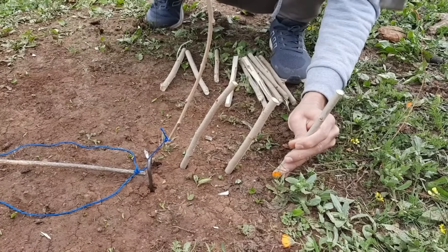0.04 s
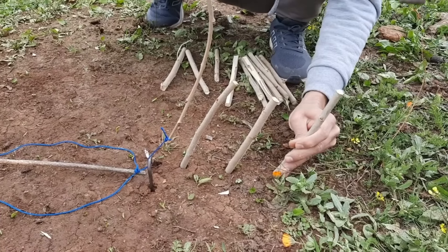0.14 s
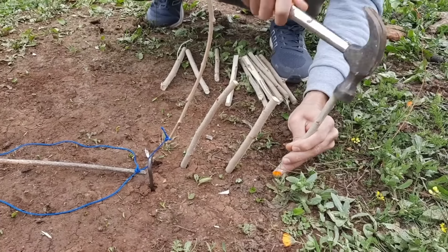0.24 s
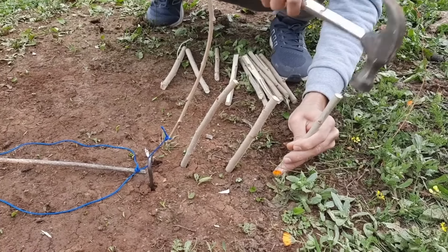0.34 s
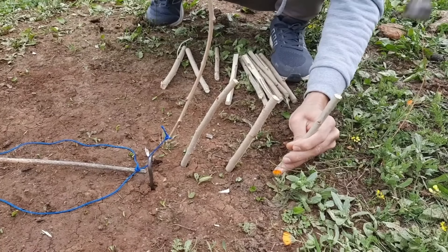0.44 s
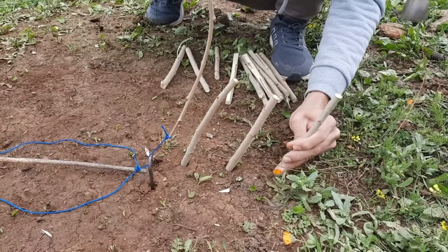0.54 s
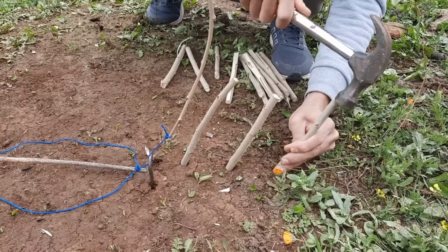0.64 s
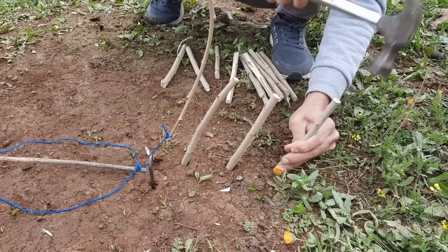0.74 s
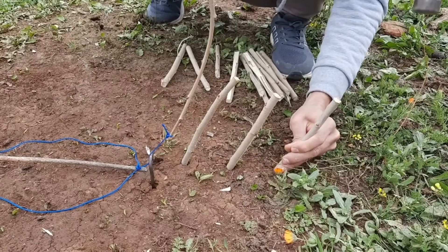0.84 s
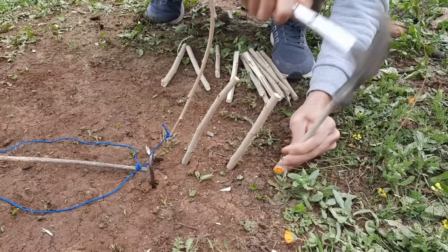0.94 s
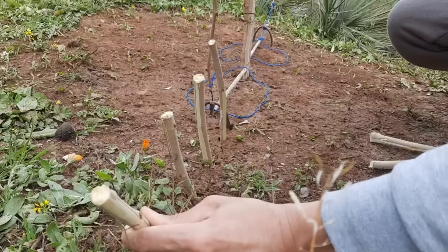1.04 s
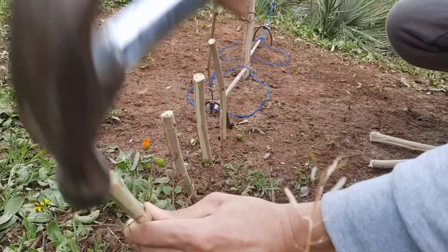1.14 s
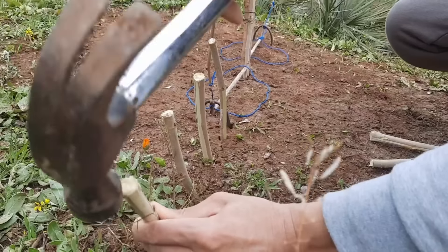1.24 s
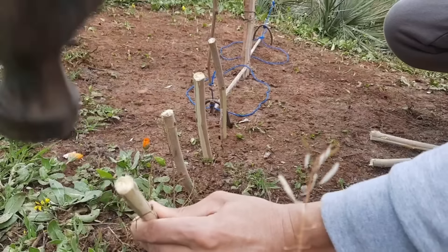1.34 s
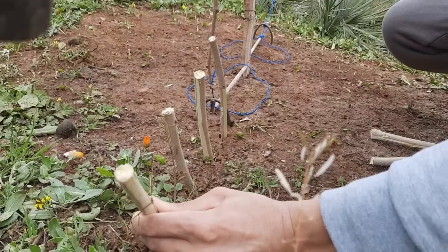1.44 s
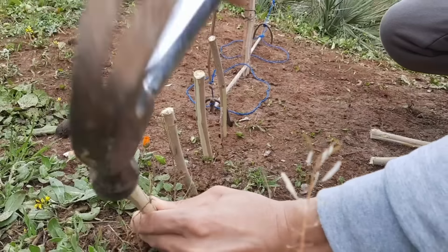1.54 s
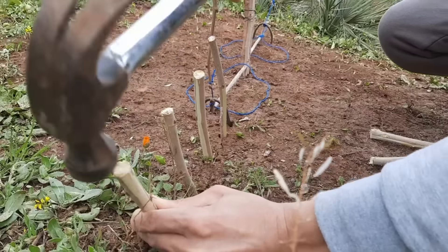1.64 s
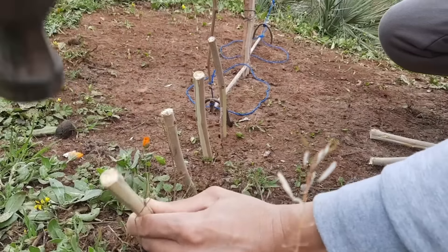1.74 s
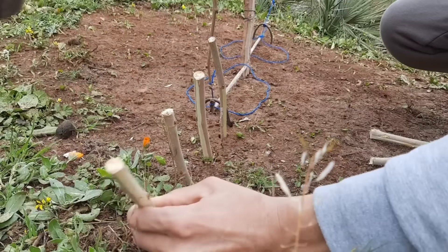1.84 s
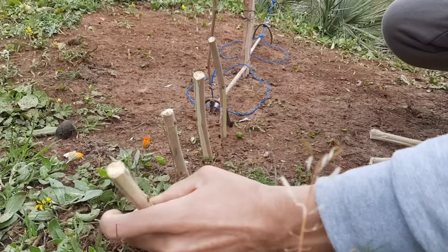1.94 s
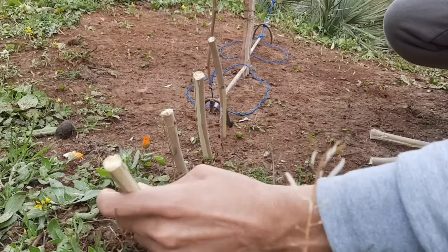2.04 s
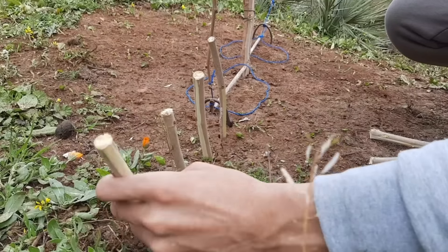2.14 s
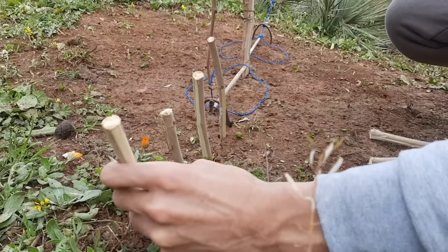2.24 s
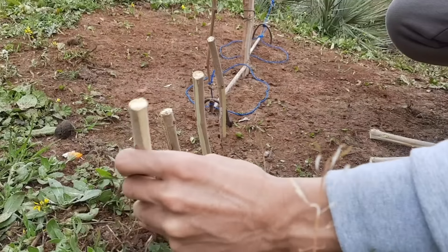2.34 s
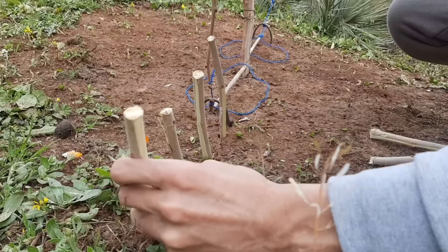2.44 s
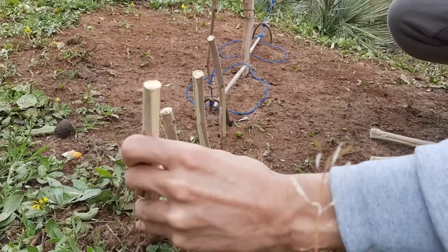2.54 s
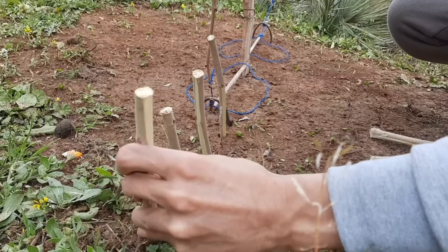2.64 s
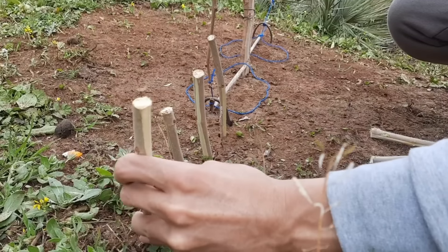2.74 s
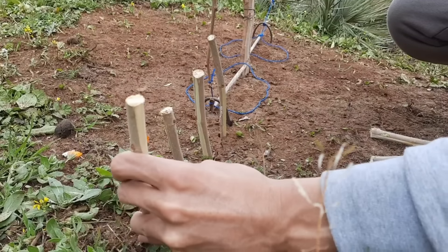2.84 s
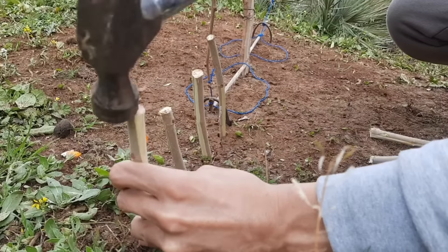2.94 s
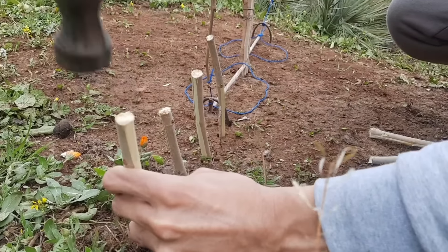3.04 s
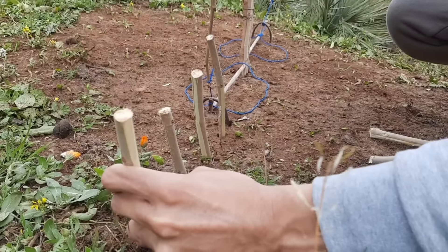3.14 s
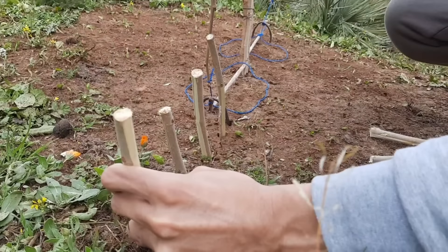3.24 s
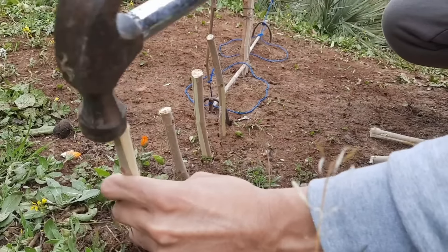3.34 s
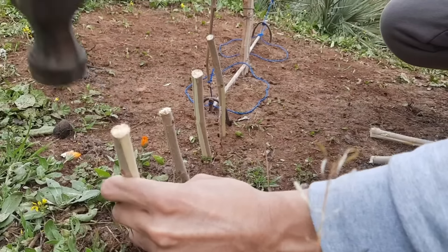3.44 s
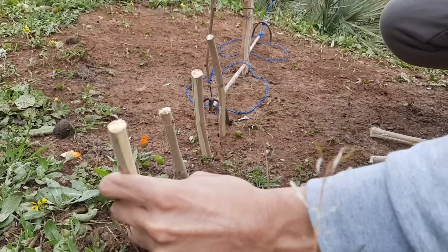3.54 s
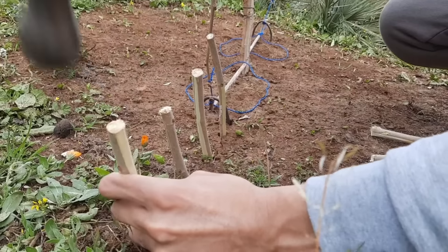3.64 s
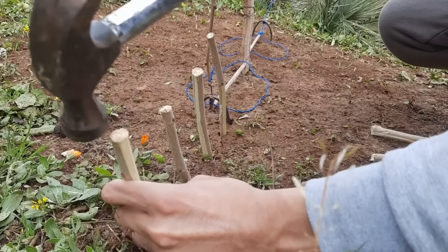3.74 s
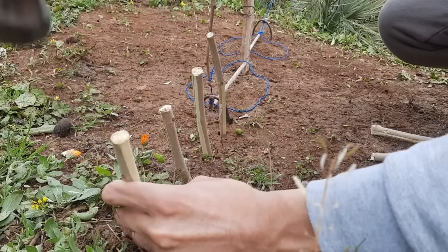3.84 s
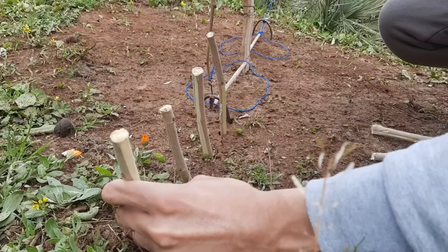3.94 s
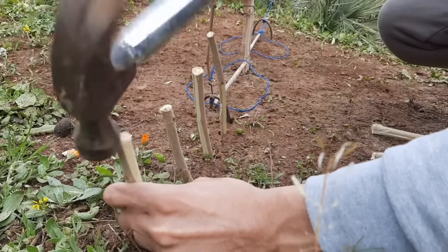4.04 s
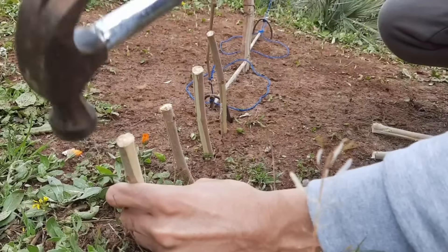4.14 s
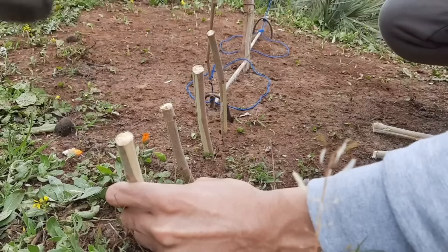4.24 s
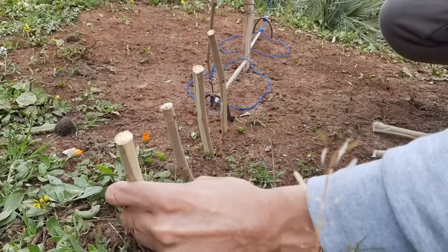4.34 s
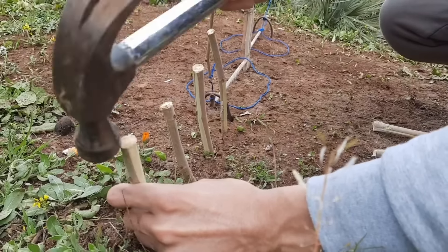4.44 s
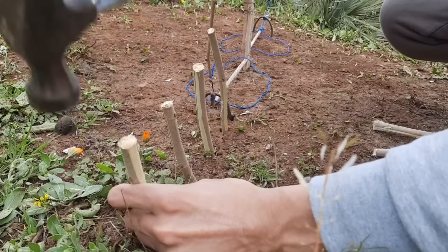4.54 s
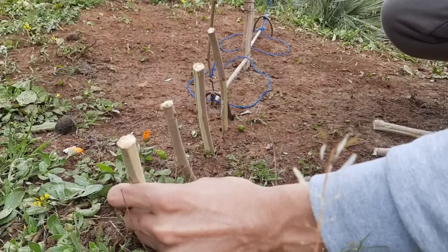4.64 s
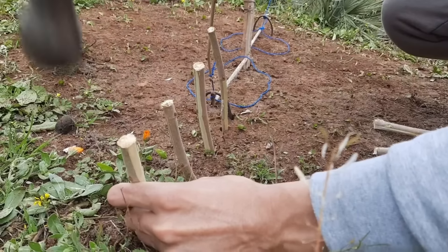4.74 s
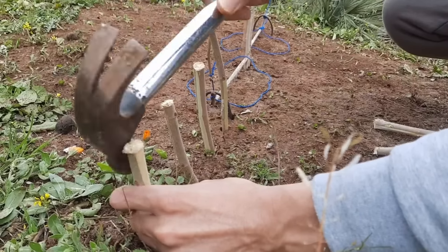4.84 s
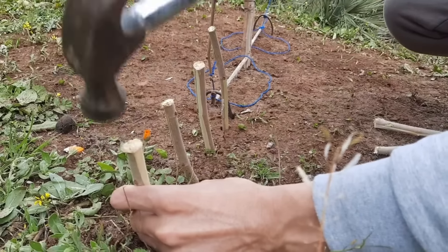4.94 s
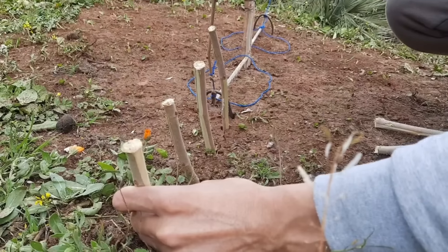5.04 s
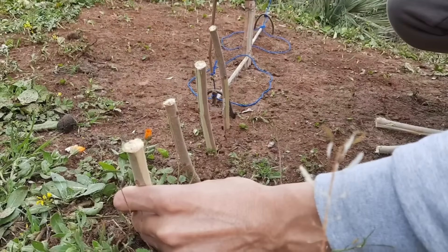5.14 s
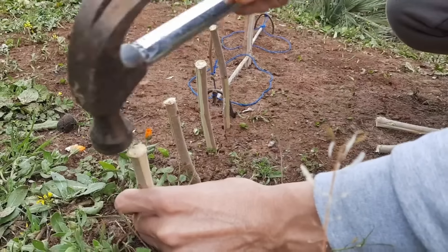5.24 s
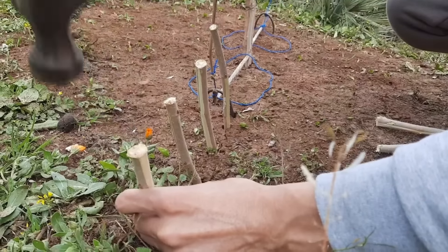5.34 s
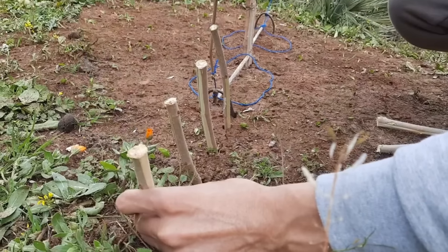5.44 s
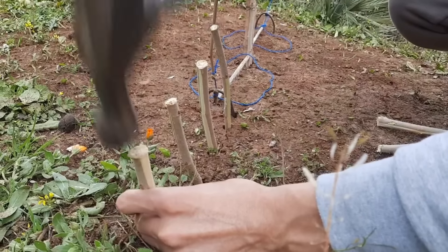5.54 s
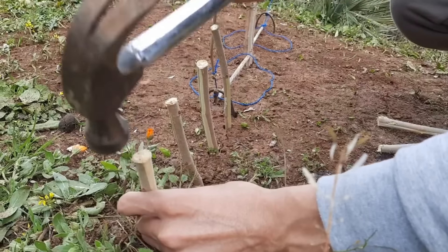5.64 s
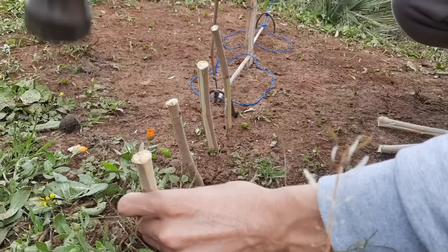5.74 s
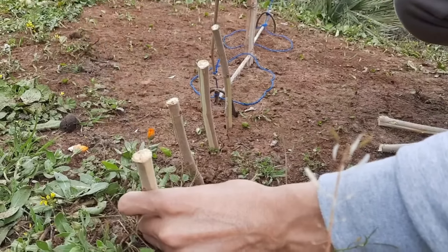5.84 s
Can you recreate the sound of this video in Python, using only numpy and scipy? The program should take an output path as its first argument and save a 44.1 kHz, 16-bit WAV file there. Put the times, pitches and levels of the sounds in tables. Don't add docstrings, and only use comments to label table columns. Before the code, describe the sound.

In an open garden, a claw hammer drives a wooden stake into dry soil close to a stereo recorder, nearer its left side. Moderate cracks fall at 0.27, 0.63, 0.98, 1.22 and 1.6 seconds; at 1.17 the background shifts abruptly as the position changes. From 1.7 to 2.9 there is a pause with tiny soil ticks and very faint leaf brushing. A light tap at 2.97 begins blows every 0.35 to 0.4 seconds until 5.62, generally harder, the strongest at 5.26. Each is a dry double crack with brief steel ring, gritty spray and low thump; some rebound quickly. A pebble rings softly at 4.73. Behind, road rumble and hiss continue, with engine drone throbbing about six times a second until roughly 3.3, then swelling unevenly. Wind buffets around 4.05 and 4.7. Faint birds whistle mostly in the first second, with a low note at 1.1 and thin chirps at 4.7 and 5.8.

```python
import sys
import numpy as np
from scipy import signal
from scipy.io import wavfile

SR = 44100
rng = np.random.default_rng(int(sys.argv[2]) if len(sys.argv) > 2 else 0)


def voltage_ratio(decibels):
    exponent = np.asarray(decibels, float) / 20
    return 10 ** exponent


def generate_wav(signal):
    frames = np.transpose(np.atleast_2d(signal))
    scaled = np.clip(frames, -1, 1) * 32767
    pcm = np.round(scaled).astype(np.int16)
    wavfile.write(sys.argv[1], SR, pcm)


N = 260190

SCENE_CHANGE_S = 1.17

# [t/s, force level/dB, wood mode f/Hz, bite into the grain level/dB, soil firmness level/dB]
BLOWS = [(0.2658, -27, 1333, 9, -30), (0.6269, -24.5, 1717, -25, -26.5), (0.9786, -22.5, 1730, -9, -30.5),
         (1.2183, -27, 1490, 3, -34), (1.6049, -22.5, 1447, 5, -37), (2.9706, -29.5, 1390, 13, -39),
         (3.3471, -19, 1404, 5, -23.5), (3.7313, -23.5, 1447, 8, -22.5), (4.1035, -20.5, 1250, 2, -23),
         (4.4744, -18.5, 1360, -3, -18), (4.8365, -17.5, 1310, -8, -16), (5.263, -13.5, 1684, 4.5, -15),
         (5.6196, -16, 1650, 5, -13.5)]
# [face flatness level/dB, off-centre ring level/dB, splintering level/dB, stake slide level/dB]
LANDINGS = [(-21, -1, -30, -42), (-35, -2, -16, -23.5), (-38, -3, -17, -21), (-38, -6, -5, -28),
            (-21, -1, -24, -30), (-55, -30, 0, -25.5), (-50, -32, -14, -19.5), (-3, -17, -5, -23.5),
            (-14, -9, -17, -16), (-7, -26, -14, -19), (-30, -22, -26, -16.5), (-6, -18, -11, -19),
            (3, -5, -3.5, -16)]
AIMING_TAPS = (.2658, 2.9706)
# [t/s, crack level/dB, soil level/dB]
REBOUNDS = [
    (1.010, -54, -32.5),
    (4.510, -58, -33),
    (4.843, -32.5, -34.5),
    (5.288, -37.5, -20.5),
    (5.294, -35.5, -30),
    (5.645, -34.5, -21),
]
# [f/Hz, level/dB, t60/s]
HEAD_MODES = [(4950, -26, .055), (3680, -47, .035), (4300, -52, .025), (7400, -57, .03), (8240, -55, .035)]
# [t/s, peak level/dB, f/Hz]
TICKS = [(.553, -62, 6800), (1.064, -54, 6500), (1.430, -58.5, 7500), (1.510, -61, 8700),
         (2.017, -58, 3760), (2.470, -64, 3560), (2.786, -53, 12300), (2.811, -53, 10800),
         (2.828, -60, 11200), (2.907, -65, 4810), (2.953, -39, 5200), (2.999, -64, 8300),
         (3.062, -56, 7860), (3.075, -64, 7650), (3.182, -67, 7700), (3.406, -42.5, 4100),
         (3.640, -62, 7600), (3.890, -64, 7740), (4.370, -63, 7520), (5.308, -70, 8000), (5.530, -68, 7400)]
# [t/s, level/dB, f/Hz, t60/s]
PEBBLE = (4.726, -43, 1250, .04)
# [t/s, length/s, level/dB]
RUSTLES = [
    (1.93, .04, -76),
    (2.81, .025, -76),
    (2.46, .04, -81),
    (5.54, .025, -79),
    (4.515, .015, -68),
    (4.36, .04, -80),
]
# [start t/s, end t/s, start f/Hz, end f/Hz, level/dB]
BIRD_NOTES = [
    (0, .16, 7270, 7100, -82.5),
    (.283, .305, 7550, 7200, -82),
    (0.332, .37, 8240, 7700, -83),
    (0.816, .97, 6650, 6650, -78),
    (.86, .98, 7400, 7350, -84),
    (0.677, .70, 5200, 5070, -74),
    (1.06, 1.166, 2160, 2185, -63),
    (4.707, 4.72, 4750, 5600, -82),
    (5.793, 5.853, 4320, 4250, -80.5),
]
# [t/s, f/Hz]
LOW_ENGINE_PITCH = [(1.17, 72.5), (3.2, 73.1), (3.6, 75), (4.1, 72), (4.5, 70.5), (5.1, 70.5), (5.5, 73),
                    (5.9, 74)]
HIGH_ENGINE_PITCH = [(1.17, 79.27), (3.1, 79.2), (3.5, 77)]
# [t/s, level/dB]
LOW_ENGINE_LEVEL = [(1.17, -50), (1.47, -40), (1.76, -50), (2.3, -41), (2.7, -41), (3.15, -58), (3.3, -41),
                    (3.43, -36), (3.58, -64), (3.92, -58), (4.2, -37.5), (4.35, -38), (4.45, -70),
                    (4.58, -36.5), (4.9, -45), (5.1, -37), (5.25, -42), (5.9, -43)]
# [t/s, level/dB]
HIGH_ENGINE_LEVEL = [(1.17, -41), (1.76, -46), (2.94, -37.5), (3.17, -39.5), (3.3, -80)]
# [from t/s, f/Hz, width f/Hz, level/dB, slope dB/s]
ENGINE_LINES = [(0, 62.3, 4.3, -60, 14.5), (0, 68.5, 0.67, -47.5, -2.1), (0, 94, 4.5, -49, -4.3),
                (SCENE_CHANGE_S, 147, 1.0, -60, .1), (SCENE_CHANGE_S, 109.6, 5.4, -61.5, -.3), (SCENE_CHANGE_S, 457, 7, -61.5, -8),
                (SCENE_CHANGE_S, 888, 25, -71, -7.6), (SCENE_CHANGE_S, 987.4, 9.9, -71, -4.5), (0, 2073, 220, -65, -1.3),
                (0, 3090, 200, -80, -3.8), (SCENE_CHANGE_S, 412.3, 50, -73.5, -1.5)]
# [f/Hz, level/dB per Hz]
ROAD_BEFORE = [(21, -52), (35, -24), (50, -5), (76, -12), (155, -20), (190, -24), (286, -21), (420, -44),
               (516, -33), (862, -26), (1480, -32), (2110, -29.5), (3620, -63), (6690, -57), (16000, -62.5)]
ROAD_AFTER = [(21, -36), (35, -7.5), (60, -8.5), (86, -4), (155, -13.5), (210, -25.5), (286, -20),
              (739, -36.5), (979, -28.5), (1170, -34.5), (2010, -38), (3270, -60.5), (9340, -60),
              (14800, -56), (16000, -70)]
# [t/s, level/dB]
TRAFFIC = [(0.0, -60.5), (0.38, -57.5), (0.9, -59.5), (1.2, -57.5), (2.6, -60), (3.05, -62), (3.4, -60.5),
           (3.88, -65), (4.24, -62), (5.64, -61), (5.9, -65)]
# [t/s, length/s, level/dB]
GUSTS = [
    (.1, .3, 4),
    (.9, .2, 4),
    (4.05, .1, 11),
    (4.7, .2, 8),
    (5.64, .1, 3.5),
]
# [f/Hz, likeness -1..1]
ALIKE_BEFORE = [(60, 0.59), (180, 0.93), (550, -0.2), (1650, -0.55), (4970, 0.098), (15000, -0.094)]
ALIKE_AFTER = [(60, 1), (180, 0.9), (550, 0.35), (1650, -0.1), (4970, 0.23), (15000, -0.28)]
# [f/Hz, left minus right level/dB]
LEAN = [(60, 3), (180, -2), (550, 6), (1650, 5.5), (4970, 2), (15000, 1.5)]


def rms_one(x):
    return x / np.sqrt(np.mean(x ** 2) + 1e-20)


def in_time(rows):
    s, *columns = np.transpose(rows)
    return [np.interp(np.arange(N) / SR, s, column) for column in columns]


def at_hz(points, hz):
    table_hz, value = np.array(points).T[:2]
    return np.interp(np.log(hz), np.log(table_hz), value)


def drift(rate):
    r = np.exp(-80 * np.pi * rate / SR)
    slow = signal.lfilter([1], [1, -2 * r, r * r], rng.standard_normal(N // 40 + 2002))[2000:]
    return np.interp(np.arange(N) / 40, np.arange(len(slow)), rms_one(slow))


def butter(x, hz, kind, order=2):
    return signal.sosfilt(signal.butter(order, hz, kind, fs=SR, output="sos"), x)


def fade(t, t60):
    return voltage_ratio(-60 * t / t60)


def ring(t, hz, t60):
    return (t >= 0) * np.sin(2 * np.pi * hz * t) * fade(np.clip(t, 0, None), t60)


def swell(t, hz, rise_s):
    u = np.clip(t, 0, None) / rise_s
    return u * np.exp(1 - u) * np.sin(2 * np.pi * hz * t)


def add(out, s, piece):
    i = round(s * SR)
    out[..., i:i + piece.shape[-1]] += piece[..., :N - i]


def wood_tap(t, wood_hz, upper_hz, upper_db, grain_db, face_db):
    body = ring(t, wood_hz, 0.0044) + voltage_ratio(grain_db) * ring(t, 2250, 0.005)
    upper = voltage_ratio(upper_db + 6) * ring(t, upper_hz, 0.006) + voltage_ratio(upper_db - 10) * swell(t, 5610, 0.00023)
    face = voltage_ratio(face_db - 1) * swell(t, 7460, 0.00019)
    return -(body + upper + face)


def crack(t, wood_hz, gap_ms, upper_hz, upper_db, grain_db, face_db, edge_db, steel_db, grit_db, noise, chance):
    wood = (wood_hz, upper_hz, upper_db, grain_db, face_db)
    taps = voltage_ratio(-4) * wood_tap(t, *wood) + wood_tap(t - gap_ms / 1000, *wood)
    taps = butter(taps, 6800, "low")

    main_hz, main_db, main_t60 = HEAD_MODES[0]
    steel = voltage_ratio(main_db + steel_db) * ring(t, main_hz, main_t60)
    for (hz, db, t60), luck in zip(HEAD_MODES[1:], chance):
        steel = steel + voltage_ratio(db + 2 * luck) * ring(t, hz, t60)

    edge = voltage_ratio(edge_db + 6.5) * butter(noise, [9300, 13500], "band") * fade(t, 0.018)
    splinter = voltage_ratio(upper_db - 5.5) * butter(noise, [2000, 7000], "band") * fade(t, 0.016)
    spray = voltage_ratio(13) * butter(noise, [4000, 10500], "band") * fade(t, 0.009)
    settle = voltage_ratio(6) * butter(noise, 3000, "low", order=3)
    settle = settle + voltage_ratio(-6) * butter(noise[::-1], 9000, "low") + voltage_ratio(-14) * butter(noise, 10000, "high")
    grit = spray + voltage_ratio(-4.5) * settle * fade(t, 0.37)
    return taps + steel + edge + splinter + voltage_ratio(grit_db) * grit


def thump(t, push_db, soil_hz, soil_db, bend_db, knock_db):
    slide_s = .0041
    push = butter(1. * (t > .0012) * (t < .0012 + slide_s), 880, "low")
    push = butter(push, 22, "high", order=1)
    soil = -swell(t - .0016 - slide_s, soil_hz, 0.0038) + voltage_ratio(-9.5) * swell(t - .008, 56, .011)
    bend = swell(t - .001, 150, .008)
    knock = -voltage_ratio(-3) * ring(t, 480, 0.015) - voltage_ratio(4) * ring(t, 850, 0.009) + voltage_ratio(-18) * ring(t - .002, 300, 0.064)
    return voltage_ratio(push_db) * push + voltage_ratio(soil_db) * soil + voltage_ratio(bend_db) * bend + voltage_ratio(knock_db) * knock


def hammer():
    out, t = np.zeros(N), np.arange(round(.25 * SR)) / SR
    noise, chance = rng.standard_normal((40, len(t))), rng.standard_normal((40, 8))
    for k, (blow, landing) in enumerate(zip(BLOWS, LANDINGS)):
        s, force_db, wood_hz, bite_db, soil_db = blow
        face_db, steel_db, upper_db, push_db = landing
        aiming = np.isclose(s, AIMING_TAPS, atol=.01).any()
        gap_ms = .78 if s < SCENE_CHANGE_S and not aiming else .65
        upper_hz = np.interp(face_db, [-20, -14], [2700, 3650])
        grit_db = -55.5 - force_db + .6 * max(force_db + 18, 0)
        hit = crack(t, wood_hz, gap_ms, upper_hz, upper_db, bite_db - 4, face_db, -25.5, steel_db, grit_db,
                    noise[k], chance[k])
        add(out, s, voltage_ratio(force_db + 5) * hit)

        soil_hz = 76 + 1.9 * max(soil_db + 25, 0)
        bend_db = -38 + .6 * (min(soil_db, -26) + 39)
        knock_db = -27.5 - 24 * aiming
        add(out, s, thump(t, push_db, soil_hz, soil_db, bend_db, knock_db))

    for k, (s, crack_db, soil_db) in enumerate(REBOUNDS, 20):
        hit = crack(t, 1400, 0.66, 3800, -27, -2, -20.5, -27.5, -6, -44, noise[k], chance[k])
        add(out, s, voltage_ratio(crack_db) * hit)
        add(out, s, voltage_ratio(soil_db) * (swell(t, 130, 0.0038) + voltage_ratio(0.5) * ring(t, 380, 0.013)))
    return out


def small_things():
    out, t = np.zeros(N), np.arange(round(.12 * SR)) / SR
    noise = rng.standard_normal((40, len(t)))
    for k, (s, db, hz) in enumerate(TICKS):
        scrape = butter(noise[k], [0.56 * hz, 1.46 * hz], "band") * fade(t, 0.0041)
        add(out, s, voltage_ratio(db - 5.5) * (swell(t, hz, 0.00044) + 1.1 * scrape))

    s, db, hz, t60 = PEBBLE
    add(out, s, voltage_ratio(db) * ring(t, hz, t60) * (1 - np.exp(-t / 0.0027)))

    clock, grains = np.arange(N) / SR, rng.standard_normal(N) * voltage_ratio(3 * drift(90))
    for s, length, db in RUSTLES:
        out += voltage_ratio(db) * butter(grains, 4000, "high") * np.exp(-((clock - s) / length) ** 2)
    return out


def near_pair(x):
    peak = 0.33 * butter(x, [7000, 8300], "band", order=1)
    dip = 0.23 * butter(x, [8900, 10600], "band", order=1)
    near = x + peak - dip
    dull = .45 * butter(x, 500, "low", order=1) + .55 * x
    dull = butter(dull, 5600, "low", order=6) + voltage_ratio(-26) * x
    lag = np.where(np.arange(N) < SCENE_CHANGE_S * SR, 0, 3)
    far = np.interp(np.arange(N) - lag, np.arange(N), dull)
    far = far * voltage_ratio(np.where(lag > 0, -3.0, -1.2))
    return np.array([near, far]) * voltage_ratio(2.5)


def birds():
    out, hoarse = np.zeros(N), drift(150)
    for start, end, from_hz, to_hz, db in BIRD_NOTES:
        trill_hz = from_hz / 165
        t = np.arange(round((end - start) * SR)) / SR
        wobble = 0.0041 * np.sin(2 * np.pi * trill_hz * t)
        rough = 0.004 * (from_hz / 4300) ** 4.0 * hoarse[:len(t)]
        hz = np.linspace(from_hz, to_hz, len(t)) * (1 + wobble + rough)
        throb = 0.83 + 0.33 * np.cos(2 * np.pi * trill_hz * t)
        whistle = np.sin(2 * np.pi * np.cumsum(hz) / SR)
        add(out, start, voltage_ratio(db + 1.5) * np.hanning(len(t)) ** 0.13 * throb * whistle)
    return out * voltage_ratio([[1.5], [-1.5]])


def engines():
    t, out = np.arange(N) / SR, np.zeros(N)
    first_swell_s = 1.228
    second_scene = np.clip((t - SCENE_CHANGE_S) * 100, 0, 1)
    for pitch, level in [(LOW_ENGINE_PITCH, LOW_ENGINE_LEVEL), (HIGH_ENGINE_PITCH, HIGH_ENGINE_LEVEL)]:
        turns = np.cumsum(in_time(pitch)[0]) / SR
        turns = turns - turns[round(first_swell_s * SR)]
        level_db = in_time(level)[0] + 2.5 + 0.43 * drift(5.5)
        out += second_scene * voltage_ratio(level_db) * np.sin(2 * np.pi * turns)

    for start, hz, width, db, slope_db in ENGINE_LINES:
        steady = 1.0 * (width < 20)
        line = (steady + drift(width)) * np.sin(2 * np.pi * hz * t)
        line = line + drift(width) * np.cos(2 * np.pi * hz * t)
        gate = np.clip((t - SCENE_CHANGE_S) / 0.0033 * (1 if start else -1), 0, 1)
        out += gate * voltage_ratio(db + slope_db * (t - start)) * line
    return out * voltage_ratio([[.75], [-.75]])


def road():
    traffic_db, = in_time(TRAFFIC)
    clock = np.arange(N) / SR
    rumble_db = sum(db * np.exp(-((clock - s) / length) ** 2) for s, length, db in GUSTS)
    before, out, together = np.arange(N) < SCENE_CHANGE_S * SR, 0, drift(4.7)
    white, edges = rng.standard_normal((2, 2, N)), 32 * 2 ** (np.arange(28) / 3)
    for k, (low, high) in enumerate(zip(edges, edges[1:])):
        mid, side = butter(white[k % 2], [low, high], "band")
        hz = np.sqrt(low * high)
        alike = np.clip(np.where(before, at_hz(ALIKE_BEFORE, hz), at_hz(ALIKE_AFTER, hz)), -1, 1)
        colour_db = np.where(before, at_hz(ROAD_BEFORE, hz), at_hz(ROAD_AFTER, hz)) + 4
        follows_db = traffic_db + 62 if hz < 4000 else 0
        flicker_db = .6 * together + 1.0 * drift(5.9)
        gain = voltage_ratio(colour_db + follows_db + rumble_db * (hz < 180) + flicker_db)
        lean = voltage_ratio(at_hz(LEAN, hz) * np.array([[.5], [-.5]]))
        pair = np.sqrt(1 + alike) * mid + np.sqrt(1 - alike) * side * [[1], [-1]]
        out = out + gain * lean * pair
    return voltage_ratio(-28) * out


def scene():
    return near_pair(hammer() + small_things()) + birds() + engines() + road()


def top_cut(x):
    return signal.sosfilt(signal.butter(12, 16680, fs=SR, output="sos"), x)


def record(dry):
    heard = .8 * np.tanh(dry / .8)
    heard = butter(heard, 40, "high", order=4)
    heard = butter(heard, 15400, "low", order=12)
    return top_cut(heard)


dry = scene()
out = record(dry)
generate_wav(out)
```